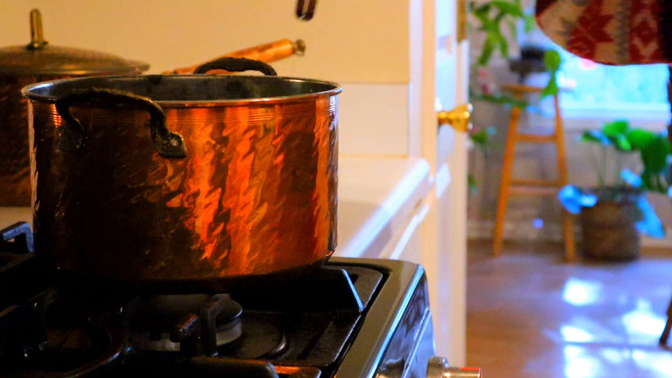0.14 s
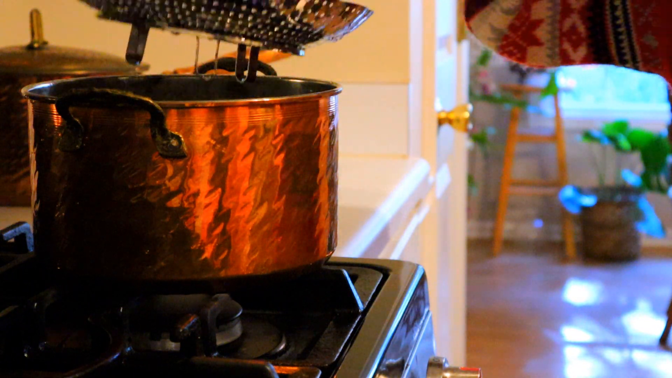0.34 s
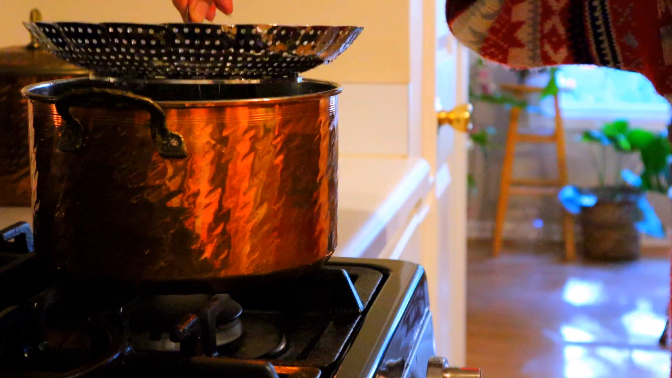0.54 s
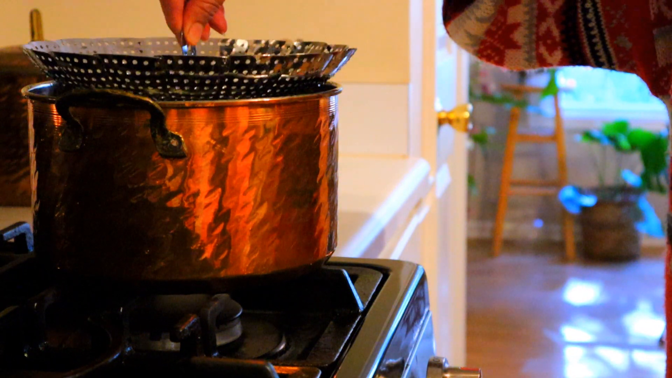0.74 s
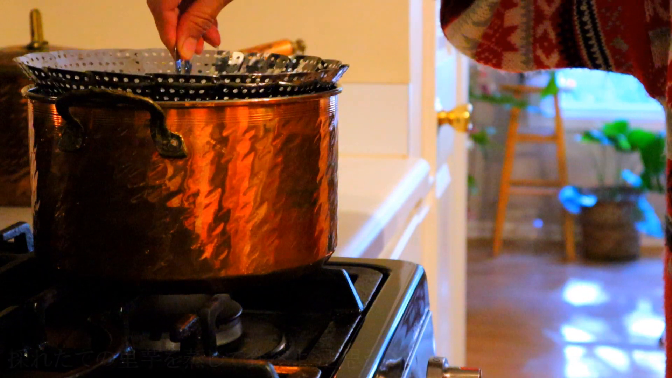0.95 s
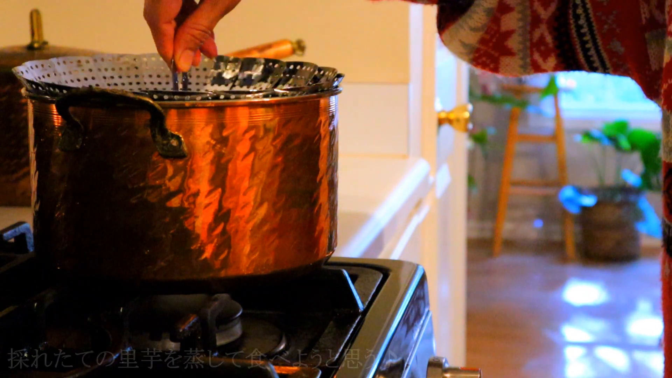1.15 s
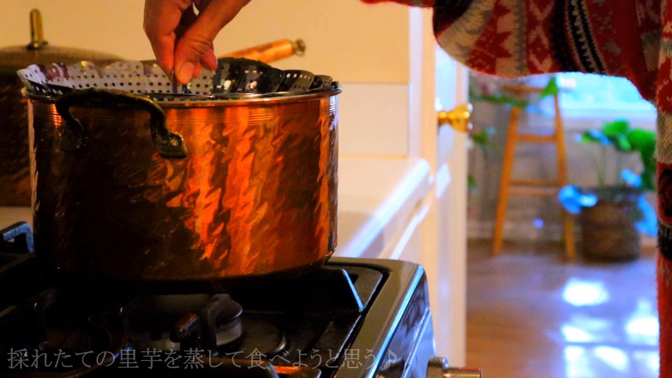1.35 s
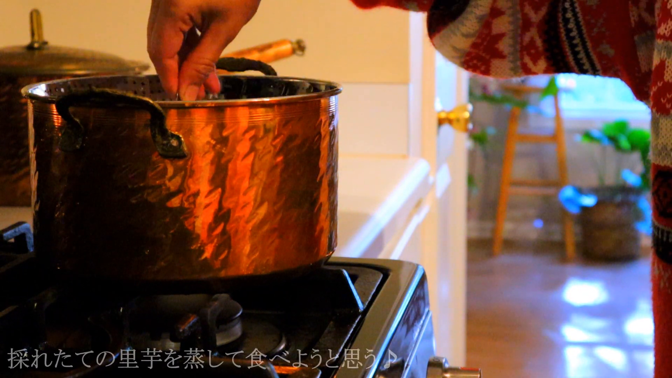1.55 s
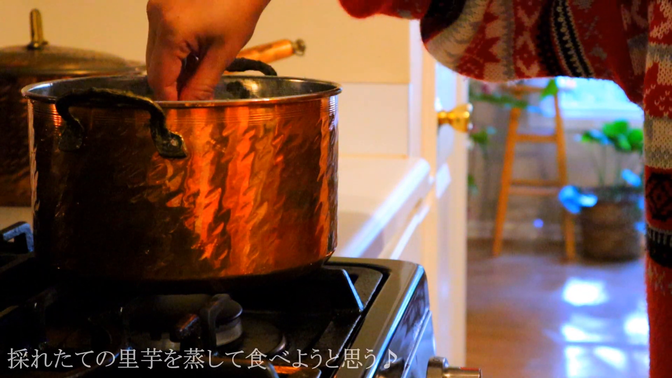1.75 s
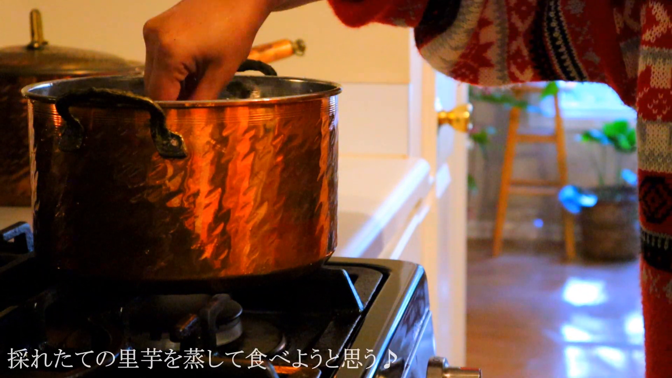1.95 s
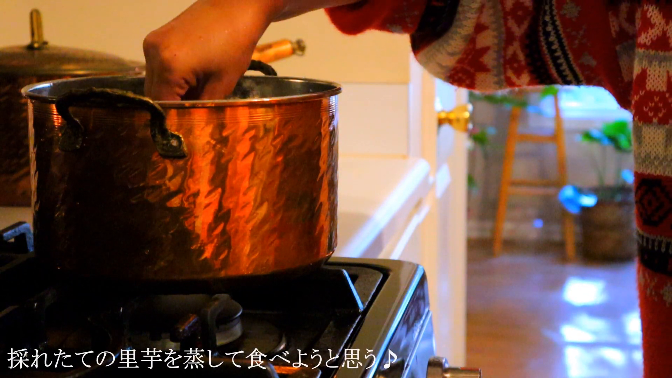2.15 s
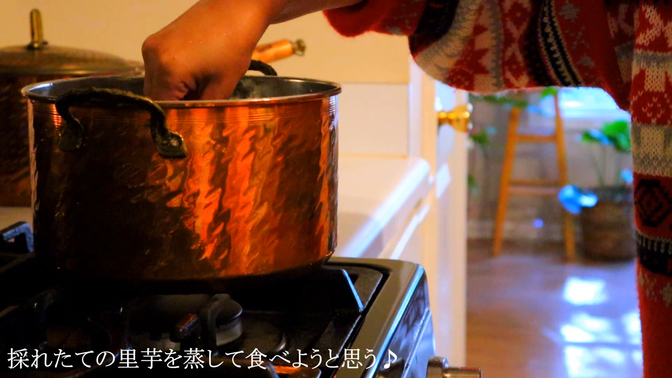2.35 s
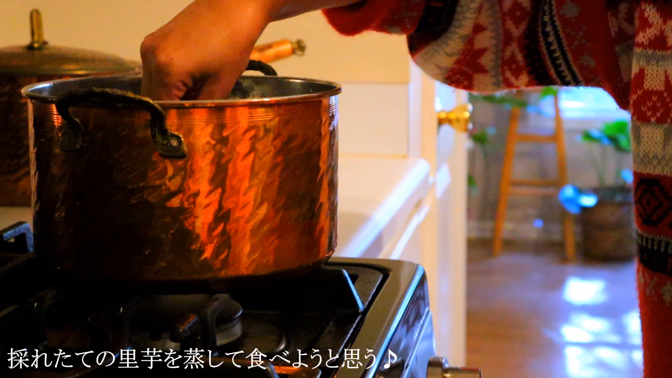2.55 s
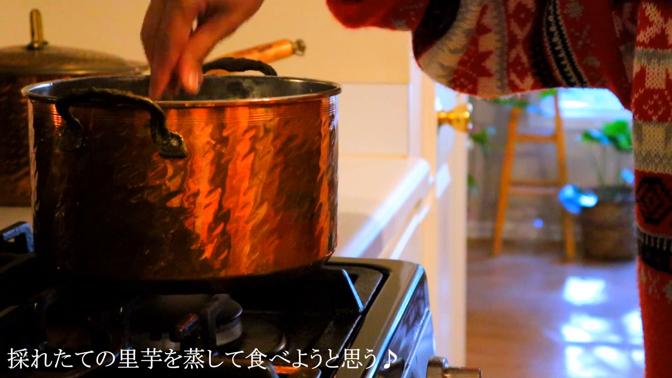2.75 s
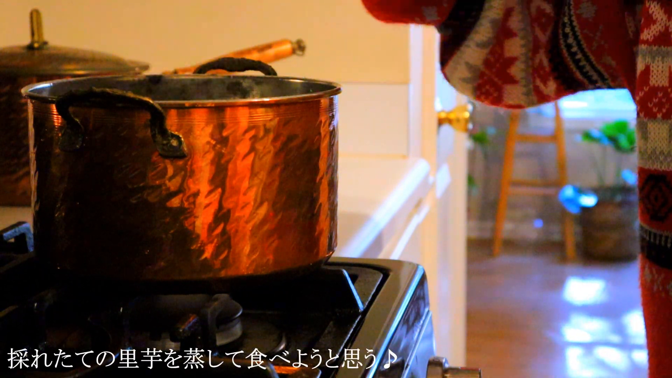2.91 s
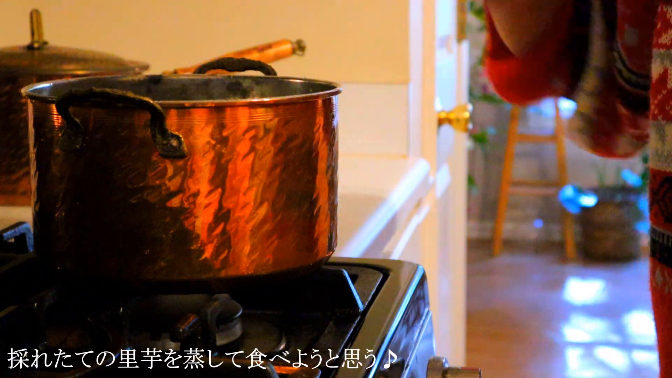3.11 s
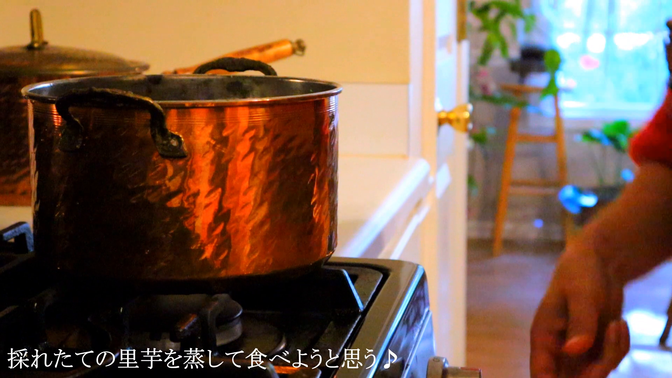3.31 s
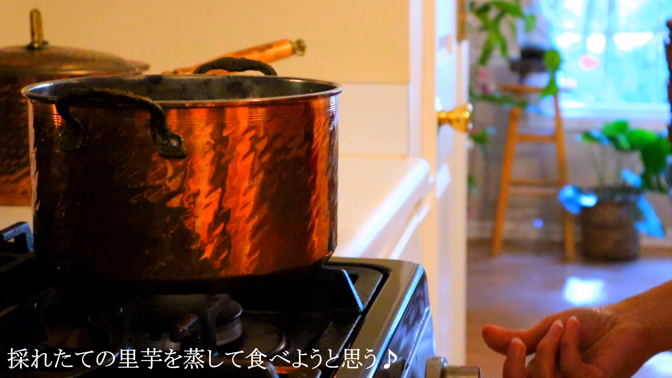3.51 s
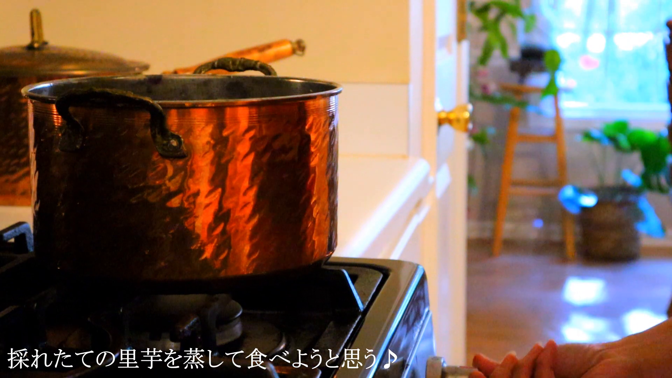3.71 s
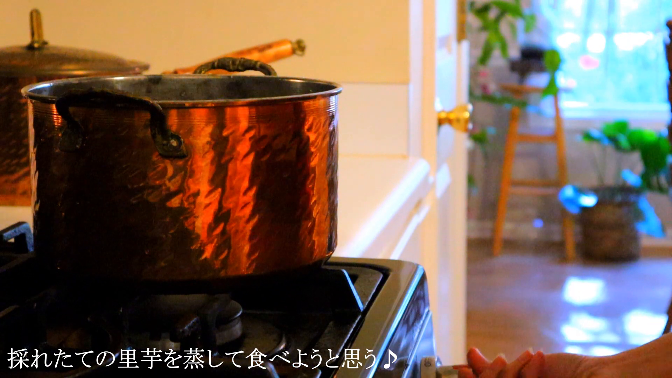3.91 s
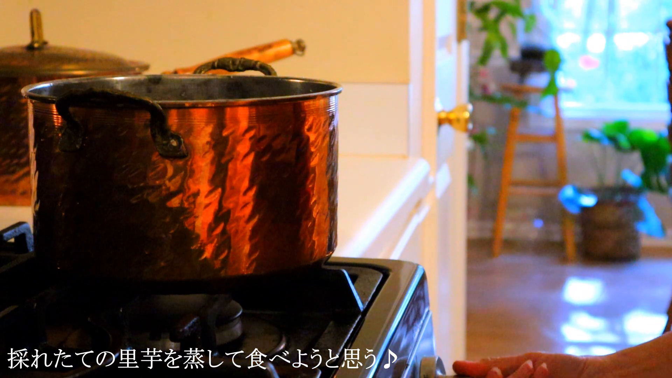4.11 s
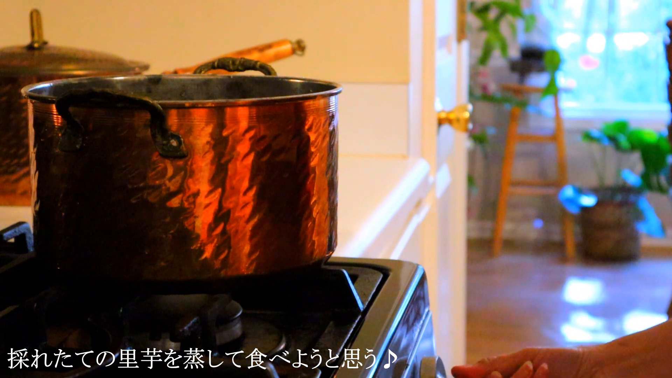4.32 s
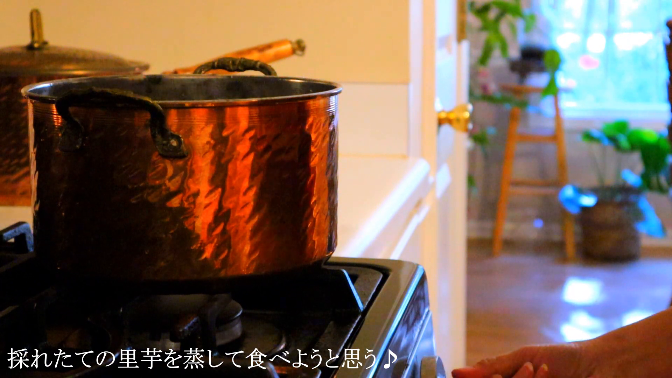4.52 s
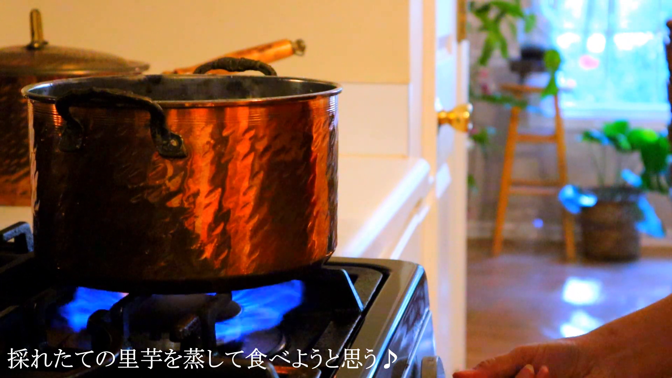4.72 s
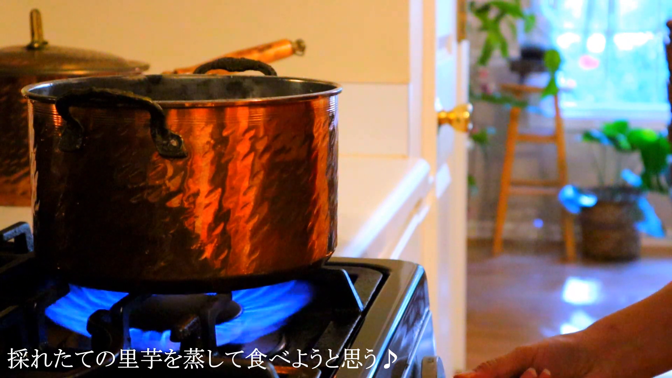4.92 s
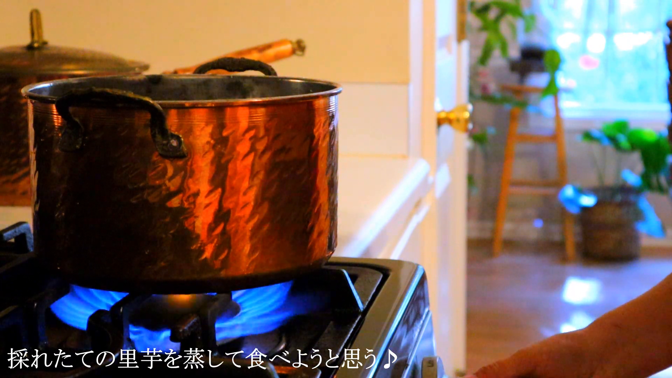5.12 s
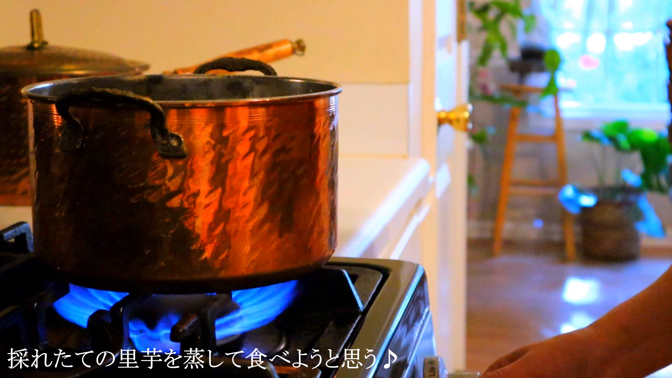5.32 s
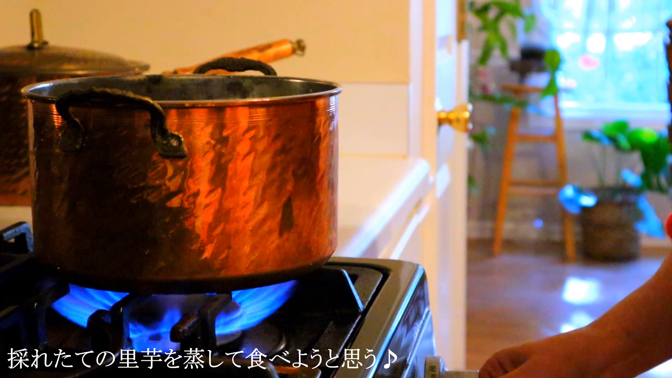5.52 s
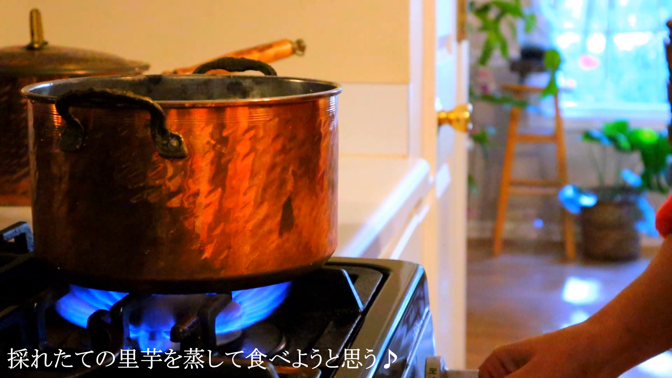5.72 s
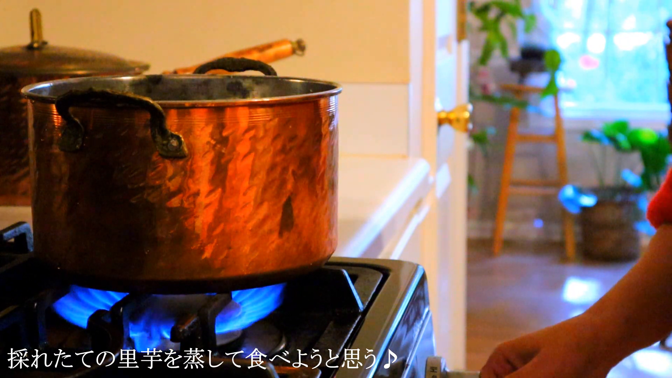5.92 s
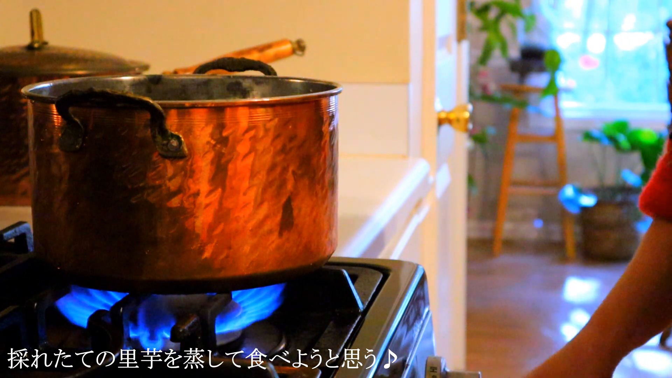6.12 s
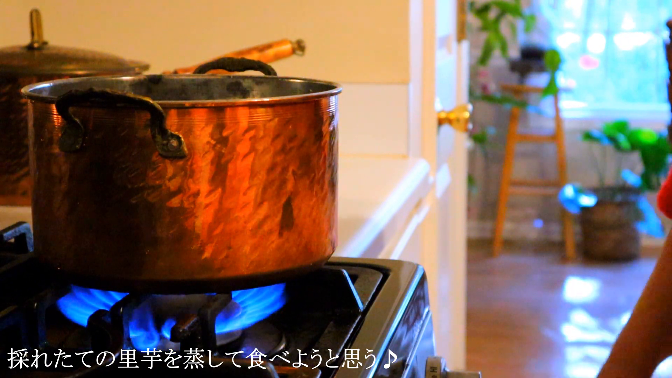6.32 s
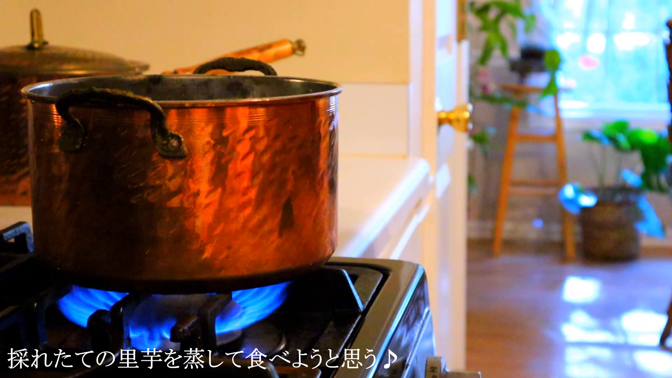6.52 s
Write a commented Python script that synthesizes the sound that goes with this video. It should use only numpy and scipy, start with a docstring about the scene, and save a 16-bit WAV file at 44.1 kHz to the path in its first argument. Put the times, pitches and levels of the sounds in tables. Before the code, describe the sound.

In a small, quiet kitchen, a folding steel basket clashes onto a pot rim, then scrapes and chatters down the inside with a ringing, metallic rasp and settles with a knock. Light ticks follow, then dull knob clunks. Five evenly spaced igniter snaps crack loudly; gas catches in a soft flutter during them, leaving a low roar and thin hiss. Close stereo microphone, with short room reverberation.

```python
"""Steamer basket and gas burner

A folding steel steamer basket lands on a copper pot in a small kitchen and is pushed down, its leaves scraping.
Steel and pot ring as decaying modes; the scrape is a random train of stick-slip clicks driving resonances.
A knob is pressed and turned with knocks and ticks, and an igniter snaps five times as short noise bursts.
The gas catches in a flutter of puffs, then the burner roars softly and hisses through the tube's resonances."""
import sys
import numpy as np
from scipy import signal
from scipy.fft import rfft, irfft
from scipy.io import wavfile

SR = 44100
rng = np.random.default_rng(int(sys.argv[2]) if len(sys.argv) > 2 else 0)


def dump(signal):
    """Clip the signal to [-1, 1] and save it as 16-bit WAV at the path in sys.argv[1]."""
    limited = np.clip(np.atleast_2d(signal).T, -1, 1)
    pcm = np.round(limited * 32767).astype(np.int16)
    wavfile.write(sys.argv[1], SR, pcm)


N = 293485
TIME = np.arange(N) / SR

# All spectra are relative densities: the sounds shaped by them are normalised afterwards.
# Flat spectrum: frequency_hz, density_db
WHITE = [(50, 0), (16000, 0)]
# Stereo width of diffuse sound: frequency_hz, side_minus_mid_db
WIDE = [(60, -17), (150, -2.5), (300, 1.5), (600, 2.5), (1200, 4.5), (12000, 8)]
# Stereo width of the room: frequency_hz, side_minus_mid_db
ROOM_WIDTH = [(150, -28), (400, -6.5), (1200, -9), (2400, 4), (5000, 0), (10000, -3.5)]
# Stereo width of the pot and basket: frequency_hz, side_minus_mid_db
POT_WIDTH = [(150, -24), (400, -3.5), (1200, -7), (3000, 4), (12000, 1)]
# Stereo width of the stove body: frequency_hz, side_minus_mid_db
STOVE_WIDTH = [(60, -23), (300, -27), (600, -10.5), (1200, -6), (3000, 5)]
# Stereo width of the flames: frequency_hz, side_minus_mid_db
FLAME_WIDTH = [(300, -27), (1200, -8.5), (2400, -6), (5000, 6), (12000, 9)]
# Stereo width of sparks and snaps, before each spark's own offset: frequency_hz, side_minus_mid_db
SPARK_WIDTH = [(1000, -12), (5000, -2.5), (8000, -4.5), (14000, -3)]

# Spectrum of the room tone: frequency_hz, density_db
ROOM_TONE_SPECTRUM = [(15, -20.5), (30, -4), (65, -1), (330, -3), (600, -5.5), (1400, -8.5), (3000, -12.5),
                      (6000, -22), (12400, -30.5), (15000, -57)]
ROOM_TONE_DB, ROOM_TONE_PAN_DB = -52.5, -1.4  # pan: left minus right
# Reverberation time of the kitchen: frequency_hz, t60_s
KITCHEN_T60 = [(100, 0.54), (500, 0.6), (2000, 0.66), (5000, 0.64), (9000, 0.47), (15000, 0.28)]

# A sleeve brushes as the basket is carried over: middle_s, half_length_s, level_db
SLEEVE = [(.08, 0.4, -60.5), (0.45, 0.073, -61)]
# Spectrum of ticks and of the brushing sleeve: frequency_hz, density_db
TICK_SPECTRUM = [(300, -8), (1500, -10), (3000, 4), (6500, 1), (10000, 0), (13000, -5.5), (16000, -62)]
# Ring of small steel parts after a tick: frequency_hz, density_db
TICK_RING_SPECTRUM = [(300, -8), (2200, -10.5), (3400, -1), (5000, -4), (8000, -8.5), (11500, -9),
                      (16000, -66)]
# Light touches of fingers on steel and knob: start_s, level_db, touch_length_s
TICKS = [(1.055, -18.5, 0.16), (1.557, -13.5, 0.087), (2.2407, -11, 0.0078), (2.4958, -11.5, 0.031),
         (2.596, -16.5, 0.032), (2.627, -11.5, 0.052), (2.833, -24.5, 0.024), (2.944, -20, 0.036),
         (2.9716, -16.5, 0.045), (3.06, -16.5, 0.2), (3.1782, -12, 0.059), (3.3059, -8, 0.072),
         (3.6857, -13, 0.1), (3.771, -14.5, 0.13), (3.8827, -8.5, 0.051), (4.003, -18, 0.046),
         (4.034, -15.5, 0.065), (4.249, -16.5, 0.15), (5.486, -18, 0.071)]
HAND_PAN_DB = -3  # left minus right
# Touches longer than this also lift one rattling resonance, by so many dB per extra second
SOFT_TOUCH_S, RATTLE_HZ, RATTLE_Q, RATTLE_DB_PER_S = 0.084, 3280, 2.5, 196
TOUCH_RISE_SHARE = 0.011  # rise time constant, as a share of the touch's length

# Spectrum of dull knocks: frequency_hz, density_db
KNOCK_SPECTRUM = [(35, -5), (80, -0.5), (160, -2), (240, -6), (340, -6.5), (520, -11.5), (800, -15.5),
                  (1100, -21.5), (1800, -28), (5000, -32.5), (14000, -58.5)]
# Knocks on pot and stove: start_s, level_db, t60_s, tilt_db_per_octave, body_hz, body_lift_db
KNOCKS = [(0.004, -12.5, 0.21, 6.5, 363, 27), (1.159, -10.5, 1, 3.5, 395, -3),
          (2.3665, -7.5, 0.052, 6.5, 613, 12.5), (2.388, -10, 0.032, 8.5, 433, 17.5),
          (2.399, -22, 0.031, 3.5, 590, 13), (2.409, -16, 0.17, -1, 185, 21),
          (3.303, -20.5, 0.1, 8, 780, 25), (3.626, -8, 0.066, 2, 385, 8), (3.666, -13, 0.21, 0.5, 340, 13),
          (3.733, -20, 0.032, -2, 278, 14), (3.887, -11, 0.25, 5.5, 824, 16),
          (3.904, -9.5, 0.091, 2, 298, 1), (3.935, -7, 0.09, 1.5, 795, 6),
          (3.953, -10, 0.076, -0.5, 330, 7), (3.976, -14.5, .16, 0, 400, -3),
          (5.385, -17, 0.042, 5, 1040, 14), (5.393, -16, 0.16, 4.5, 402, 5.5)]
# Sheet-metal stove top: pitch_hz, t60_s
STOVE_TOP = (162, .33)
# Pushes on the knob that set the stove top humming: start_s, level_db
PUSHES = [(3.63, -42), (3.73, -45), (3.903, -39), (3.932, -40)]

# Spectrum of a spark's crack and rattle: frequency_hz, density_db
SPARK_SPECTRUM = [(150, -19.5), (600, -27), (1200, -18.5), (2800, -8), (4000, -10.5), (5500, -4.5),
                  (7500, 2), (9000, -4.5), (11000, -2), (13000, -10), (16000, -29)]
# Spectrum a spark sends into the room: frequency_hz, density_db
SPARK_SPREAD = [(150, -45), (600, -23), (1200, -17.5), (2800, -9), (5500, -3), (7500, 2), (11000, 0),
                (13000, -7.5), (15500, -49)]
# Igniter sparks: start_s, level_db, arc_t60_s, width_offset_db
SPARKS = [(4.358, 11, 0.0053, 11.5), (4.5571, 10.5, 0.012, 5.5), (4.7574, 10.5, 0.012, 3.5),
          (4.9572, 8, 0.0094, -6), (5.157, 7, 0.012, -1.5)]
# Separate echoes of a spark off hob and walls: delay_s, level_db
SPARK_ECHOES = [(.0032, -10), (0.0134, -18.5), (.05, -33)]

# Spectrum of a puff of catching gas, before the bass is removed: frequency_hz, density_db
PUFF_SPECTRUM = [(45, -20), (80, 2), (140, 0), (215, -8), (520, -12.5), (620, -6), (850, -10.5),
                 (1150, -20), (2000, -19), (4000, -38), (9000, -60)]
# The flame jumps round the burner in an uneven run of puffs: start_s, level_db
PUFFS = [(4.78, -12.5), (4.794, -8), (4.811, -7), (4.838, -6.5), (4.851, -7.5), (4.878, -5), (4.884, -7.5),
         (4.908, -9.5), (4.926, -9)]
# Spectrum of the flames' roar: frequency_hz, density_db
FLAME_SPECTRUM = [(24, -34), (40, -16), (70, 2), (112, -8), (136, 2), (218, 0.5), (271, -4), (520, -8),
                  (631, -5.5), (1000, -6), (1270, -12), (1920, -19), (2280, -14.5), (3970, -16.5),
                  (4480, -27), (5440, -19), (11000, -22), (13000, -48)]
# Resonances of the mixing tube, levels relative: centre_hz, width_hz, level_db
TUBE = [(609, 13, -4), (1292, 71, -5.5), (2265, 62, -10), (3037, 55, -10.5), (4360, 79, -11.5),
        (4690, 80, -13.5), (6170, 380, -18.5), (7520, 92, -16.5), (9950, 170, -22), (10760, 130, -14.5),
        (11270, 210, -19)]
# Gas flow, as the mean level of the jet: time_s, level_db
GAS_FLOW = [(4.7, -100), (4.9, -60), (5.4, -54), (6.0, -53.5), (6.65, -48)]
# The roar follows the flow, and builds up while the flames settle on their ports
ROAR_DB, FLAMES_SETTLED_S, ROAR_BUILD_DB_PER_S = 0.8, 5.99, 20

# Basket and pot ringing together, levels relative: pitch_hz, level_db
BASKET_MODES = [(1147, -11), (1427, -10), (1661, -9), (1788, -10), (1850, -8), (2098, -7), (2209, -6),
                (2405, -7), (2500, -11), (2789, -3), (2835, -6), (2892, -3), (2978, -4), (4358, -13),
                (5135, -12), (5525, -14)]
BASKET_T60_S, BASKET_PAN_DB = 0.36, -0.5  # pan: left minus right
# Spectrum of clashing leaves: frequency_hz, density_db
LEAF_SPECTRUM = [(150, -28), (303, -28), (410, -8), (998, -20), (1630, -5), (2400, -3), (2850, -1.5),
                 (3230, -6.5), (6080, -17.5), (8570, -24), (10200, -19.5), (12600, -29), (15000, -50)]
# Leaves landing on rim, then bottom: start_s, strength_db, tilt_db_per_octave, leaf_hz, leaf_share_db
LANDING = [(1.1591, 1.5, 2, 12500, -2), (1.163, -4.5, 3, 2800, -10), (1.183, -5.5, -1, 3500, -6),
           (1.19, -6.5, -0.5, 2900, -1), (1.212, -7.5, -2, 2400, -2), (1.226, -7, 4, 2880, -4),
           (1.2441, -8.5, 1, 5640, -5), (1.2569, -7, 2.5, 6140, -5.5), (2.366, -12.5, 5, 1900, -6),
           (2.381, -11, 3, 1880, -2), (2.388, -14.5, 6, 2900, -1)]
CLASH_T60_S, LEAF_Q = 0.13, 12
# A leaf catches and sings: start_s, length_s, pitch_hz, level_db
SQUEALS = [(1.688, 0.08, 2960, -33.5), (1.825, .03, 2900, -39), (2.04, 0.08, 1153, -46),
           (2.09, 0.06, 2870, -39.5)]
SQUEAL_ATTACK_S, SQUEAL_RELEASE_S = 0.003, 0.015  # time constants
# The basket slides down: start_s, end_s
SLIDING_S = (1.22, 2.42)
# How hard the leaves bear on the pot wall, before each layer's own offset: time_s, level_db
SLIDE = [(1.22, -80), (1.26, -62), (1.49, -49), (1.57, -45.5), (1.675, -43.5), (1.75, -30), (1.795, -34),
         (1.9, -32), (1.99, -32), (2.045, -34), (2.115, -34.5), (2.33, -43), (2.42, -52)]
# Spectrum of the sheet's dense modes under the scrape: frequency_hz, density_db
SCRAPE_SPECTRUM = [(80, -30), (230, -17), (600, -10), (950, -14.5), (1200, -3.5), (1800, -5), (2900, 2),
                   (3800, -1), (5500, -5), (15000, -37)]
SHEET_T60_S = 0.12
# Spectrum of the fine rasp: frequency_hz, density_db
RASP_SPECTRUM = [(2000, -23), (4000, -10.5), (5400, 1.5), (7000, -5), (9000, -8), (11000, -3.5),
                 (13000, -7), (15500, -54)]
# Rasp at the hardest push; it grows faster than the scrape, and as the leaves fold tighter
RASP_DB, RASP_FOLLOWS, RASP_DB_PER_S = -34, 1.62, 7.5
# The leaves give way and rasp harder for a moment: start_s, decay_s, extra_db
GIVE_WAY = (1.972, 0.17, 7.8)
# Broad resonances of the leaves under the scrape, mean levels relative: pitch_hz, level_db
LEAF_BANDS = [(1650, -6), (2210, -1.5), (2420, -6), (2800, -4), (2980, 0.5), (3330, -6.5), (4400, -1.5),
              (5510, -13), (11800, -25)]
BAND_WIDTH = 0.025  # half width, as a share of the pitch
# The bands swell and shift as the contact moves: rate, swell in dB, shift as a share of the pitch
CONTACT_MOVES_PER_S, BAND_SWELL_DB, BAND_SHIFT = 22, 3.5, 0.035
# Chatter against the scrape at its hardest, and how much faster it grows
CHATTER_DB, CHATTER_FOLLOWS = -5.5, 1.4

CUTOFF_HZ = 16000


def from_db(db):
    """Level: decibels express a logarithmic amplitude ratio, here turned to gain."""
    return 10 ** (np.asarray(db) / 20)


def rms_one(x):
    """Mean power: scale a signal to rms 1."""
    return x / np.sqrt(np.mean(x ** 2) + 1e-20)


def energy_one(x):
    """Impulse energy: scale a response to energy 1 a channel on average."""
    return rms_one(x) / np.sqrt(x.shape[-1])


def in_time(rows):
    """Level history: interpolate dB over time, at -120 dB before the first point."""
    return np.interp(TIME, *np.transpose(rows), left=-120)


def at_hz(points, hz):
    """Logarithmic frequency: interpolate a table along a log-frequency axis."""
    table_hz, values = np.array(points).T
    return np.interp(np.log(hz + 1), np.log(table_hz), values)


def fade(t60):
    """Exponential decay: one second of a level falling 60 dB in t60 seconds."""
    return np.exp(-np.log(1000) * TIME[:SR] / t60)


def swell(rise_s):
    """Exponential approach: one second of a rise to 1 with time constant rise_s."""
    return 1 - np.exp(-TIME[:SR] / rise_s)


def pan(db):
    """Interaural level difference: left and right gains, left minus right in dB."""
    return from_db(db * np.array([[0.5], [-0.5]]))


def add(out, s, sound):
    """Superposition: mix a sound in at time s."""
    start = max(round(s * SR), 0)
    out[..., start:start + sound.shape[-1]] += sound[..., :N - start]


def through(x, response):
    """Linear response: convolve a sound with an impulse response."""
    return signal.fftconvolve(np.atleast_2d(x), response, axes=-1)[:, :N]


def peak(x, hz, q):
    """Simple resonance: keep the band around hz, with quality factor q."""
    return signal.lfilter(*signal.iirpeak(hz, q, fs=SR), x + 1e-18)


def drift(rate, size=N):
    """Random fluctuation: noise through a double low-pass at rate Hz, with spread 1."""
    step, run_in = 8, 4000  # computed at every eighth sample, after the filter has settled
    r = np.exp(-2 * np.pi * rate * step / SR)
    white = rng.standard_normal(size // step + run_in + 2)
    slow = signal.lfilter([1], [1, -2 * r, r * r], white)[run_in:]
    return np.interp(np.arange(size) / step, np.arange(len(slow)), rms_one(slow))


def noise(spectrum, width, size, tilt_db=0, wider_db=0):
    """Partial coherence: coloured noise from independent mid and side signals; rms 1."""
    hz = np.fft.rfftfreq(size, 1 / SR)
    mid, side = rfft(rng.standard_normal((2, size)))
    spread = from_db(at_hz(width, hz) + wider_db)
    colour = from_db(at_hz(spectrum, hz) + tilt_db * np.log2(1 + hz))
    left_right = (mid + spread * side * [[1], [-1]]) / np.hypot(1, spread)
    return rms_one(irfft(colour * left_right, size))


def burst(spectrum, width, t60, tilt_db=0, wider_db=0, rise_s=0.0011):
    """Modal overlap: a struck cluster of dense modes as decaying noise; soft contacts rise slowly; energy 1."""
    modes = noise(spectrum, width, SR, tilt_db, wider_db)
    return energy_one(modes * fade(t60) * swell(rise_s))


def smooth_clicks(rows, spectrum):
    """Radiated power: clicks summed over all directions have an even spectrum, without one path's notches."""
    clicks = np.zeros(N)
    for s, db, *rest in rows:
        clicks[round(s * SR)] = from_db(db)
    colour = rms_one(from_db(at_hz(spectrum, np.fft.rfftfreq(N, 1 / SR))))
    return irfft(rfft(clicks) * colour, N)


def room_tone():
    """Stationary background: steady coloured noise gives the kitchen's quiet hum."""
    return from_db(ROOM_TONE_DB) * noise(ROOM_TONE_SPECTRUM, WIDE, N) * pan(ROOM_TONE_PAN_DB)


def kitchen(build_s=0.018, uneven_db=2.5, blend_s=0.15):
    """Reverberation: reflections start in uneven clumps, blend, and die band by band."""
    white, hz = rfft(noise(WHITE, ROOM_WIDTH, SR)), np.fft.rfftfreq(SR, 1 / SR)
    centres = np.geomspace(100, 15000, 8)
    tail = 0
    for centre, row in zip(centres, np.eye(len(centres))):
        share = np.interp(np.log(hz + 1), np.log(centres), row)  # overlapping bands that sum to 1
        tail = tail + irfft(white * share, SR) * fade(at_hz(KITCHEN_T60, centre))
    clumps = from_db(uneven_db * drift(400, SR) * np.exp(-TIME[:SR] / blend_s))
    return energy_one(tail * swell(build_s) * clumps)


def sleeve():
    """Friction noise: a brushing sleeve gives noise under bell-shaped swells."""
    brushing = sum(from_db(db) * np.exp(-((TIME - s) / half_s) ** 2) for s, half_s, db in SLEEVE)
    return brushing * noise(TICK_SPECTRUM, WIDE, N, tilt_db=3.5)


def rattle_lift_db(touch_s):
    """Contact duration: a touch past the soft limit lifts the rattle in proportion to the excess."""
    return RATTLE_DB_PER_S * max(touch_s - SOFT_TOUCH_S, 0)


def ticks(softening_db_per_s=170):
    """Contact stiffness: a tick is a snap and a short ring; longer touches snap less, the longest rattle."""
    out = np.zeros((2, N))
    for s, db, touch_s in TICKS:
        snap = burst(TICK_SPECTRUM, SPARK_WIDTH, t60=0.005, tilt_db=1.5, rise_s=0.0001)
        ring = burst(TICK_RING_SPECTRUM, WIDE, t60=touch_s + 0.1, rise_s=TOUCH_RISE_SHARE * touch_s)
        rattle = (from_db(rattle_lift_db(touch_s)) - 1) * peak(ring, RATTLE_HZ, RATTLE_Q)
        softened_snap = from_db(-softening_db_per_s * touch_s) * snap
        add(out, s, from_db(db) * (softened_snap + energy_one(ring + rattle)))
    return out


def handling(body_q=1.8):
    """Impact excitation: seating basket and turning knob knock on bodies; pushes make the stove top hum."""
    out = np.zeros((2, N))
    for s, db, t60, tilt_db, body_hz, lift_db in KNOCKS:
        knock = burst(KNOCK_SPECTRUM, STOVE_WIDTH, t60, tilt_db)
        body = (from_db(lift_db) - 1) * peak(knock, body_hz, body_q)
        add(out, s, from_db(db) * energy_one(knock + body))
    hum_hz, hum_t60 = STOVE_TOP
    envelope = fade(hum_t60) - fade(0.022)  # the faster decay makes a soft onset
    for s, db in PUSHES:
        add(out, s, from_db(db) * np.sin(2 * np.pi * hum_hz * (s + TIME[:SR])) * envelope)
    return out


def igniter(rattle_db=-0.5, uneven_db=-0.5):
    """Impulsive source: a spark cracks, rattles unevenly between hob and pot, and returns as discrete echoes."""
    out = np.zeros((2, N))
    for s, db, arc_s, wider_db in SPARKS:
        crack = burst(SPARK_SPECTRUM, SPARK_WIDTH, arc_s, wider_db=wider_db, rise_s=0.00063)
        rattle = burst(SPARK_SPECTRUM, SPARK_WIDTH, t60=0.05, wider_db=wider_db)
        rattle = energy_one(rattle * from_db(uneven_db * drift(500, SR)))
        add(out, s, from_db(db) * energy_one(crack + from_db(rattle_db) * rattle))
        for delay_s, echo_db in SPARK_ECHOES:
            echo = burst(SPARK_SPREAD, ROOM_WIDTH, t60=0.008, rise_s=0.0003)
            add(out, s + delay_s, from_db(db + echo_db) * echo)
    return out


def ignition():
    """Combustion pulses: catching gas gives a quick run of soft noise puffs, with no deep bass."""
    out = np.zeros((2, N))
    for s, db in PUFFS:
        add(out, s, from_db(db) * burst(PUFF_SPECTRUM, STOVE_WIDTH, t60=0.14))
    return signal.sosfilt(signal.butter(5, 58, "high", fs=SR, output="sos"), out + 1e-18)


def burner():
    """Turbulent flow: flames roar softly while jet noise hisses through the mixing tube's resonances."""
    jet_db = in_time(GAS_FLOW)
    roar_db = jet_db + ROAR_DB - ROAR_BUILD_DB_PER_S * np.maximum(FLAMES_SETTLED_S - TIME, 0)
    roar = from_db(roar_db + 0.77 * drift(rate=12)) * noise(FLAME_SPECTRUM, FLAME_WIDTH, N)
    hz = np.fft.rfftfreq(N, 1 / SR)
    tube_power = sum(from_db(db) ** 2 / (1 + (2 * (hz - centre) / width) ** 2) for centre, width, db in TUBE)
    turbulence = noise(WHITE, FLAME_WIDTH, N, tilt_db=1.5)
    jet = rms_one(irfft(np.sqrt(tube_power) * rfft(turbulence), N))
    return roar + from_db(jet_db + 2.2 * drift(rate=2)) * jet


def basket_ring():
    """Modal superposition: decaying sines, each reaching each ear with a phase of its own; energy 1."""
    phases = rng.uniform(0, 2 * np.pi, (len(BASKET_MODES), 2, 1))
    modes = 0
    for (hz, db), phase in zip(BASKET_MODES, phases):
        modes = modes + from_db(db) * np.sin(2 * np.pi * hz * TIME[:SR] + phase)
    return energy_one(modes * fade(BASKET_T60_S))


def landing():
    """Impact excitation: each touch clashes all the leaves and makes the struck one ring above the rest."""
    out = np.zeros((2, N))
    for s, db, tilt_db, leaf_hz, leaf_db in LANDING:
        clash = burst(LEAF_SPECTRUM, POT_WIDTH, CLASH_T60_S, tilt_db, rise_s=0.00032)
        leaf = from_db(leaf_db) * energy_one(peak(clash, leaf_hz, LEAF_Q))
        add(out, s, from_db(db) * (clash + leaf + from_db(-5.0) * basket_ring()))
    return out


def squeals(waver=0.011, rough_db=4.0):
    """Mode locking: friction locks on to single modes, which sing unsteadily; waver is a share of the pitch."""
    out, t = np.zeros((2, N)), TIME[:SR]
    wander = np.cumsum(waver * drift(rate=93.0)) / SR
    for s, length_s, hz, db in SQUEALS:
        envelope = swell(SQUEAL_ATTACK_S) * np.exp(-np.maximum(t - length_s, 0) / SQUEAL_RELEASE_S)
        phase = 2 * np.pi * hz * (t + wander[round(s * SR):][:SR])
        ear_phases = np.array([[0], [1]])  # radians
        add(out, s, from_db(db) * envelope * np.sin(phase + ear_phases))
    return out * from_db(rough_db * drift(rate=170))


def slips(per_s, spread_db):
    """Stick-slip: a dense random train of uneven clicks of either sign; rms 1."""
    sizes = from_db(spread_db * np.minimum(rng.exponential(1, N), 4)) * rng.choice([-1, 1], N)
    return rms_one(sizes * (rng.random(N) < per_s / SR))


def leaf_bands():
    """Driven resonance: friction feeds broad bands, each swelling and shifting alone; rms 1 while sliding."""
    out, (start, end) = np.zeros((2, N)), SLIDING_S
    size, bands = round((end - start) * SR), 0
    for hz, db in LEAF_BANDS:
        width_hz = BAND_WIDTH * hz
        shifting_hz = hz * (1 + BAND_SHIFT * drift(CONTACT_MOVES_PER_S, size))
        phase = 2 * np.pi * np.cumsum(shifting_hz) / SR
        # slow noise on cosine and sine makes a narrow noise band, independent at each ear
        ears = [drift(width_hz, size) * np.cos(phase) + drift(width_hz, size) * np.sin(phase) for ear in range(2)]
        bands = bands + from_db(db + BAND_SWELL_DB * drift(CONTACT_MOVES_PER_S, size)) * np.array(ears)
    add(out, start, rms_one(bands))
    return out


def chatter(count=300, t60=0.12, spread_db=4.0, low_hz=1400, high_hz=7000):
    """Catch and release: leaf edges let go, each with a short ring at its own pitch; rms 1 while sliding."""
    out, (start, end) = np.zeros((2, N)), SLIDING_S
    size = SR // 6
    decay = fade(t60)[:size]
    for when, pitch, grip, left, right in rng.random((count, 5)):
        hz = low_hz * (high_hz / low_hz) ** pitch
        phase = 2 * np.pi * (hz * TIME[:size] + np.array([[left], [right]]))
        gain = from_db(-spread_db * np.log(grip + 0.062))
        add(out, start + (end - start) * when, gain * np.sin(phase) * decay)
    return rms_one(out) * np.sqrt((end - start) * SR / N)


def basket(judder_db=-1.0, judder_hz=70):
    """Stick-slip excitation: the leaves fold and scrape down the inside of the pot, juddering as they go."""
    scrape_db = np.where(TIME < SLIDING_S[1], in_time(SLIDE), -120)
    hardest_db = scrape_db.max()
    push_db = scrape_db - hardest_db
    folded_s = np.clip(TIME, *SLIDING_S) - TIME[scrape_db.argmax()]  # from the hardest push
    rasp_db = RASP_DB + RASP_FOLLOWS * push_db + RASP_DB_PER_S * folded_s
    give_s, decay_s, give_db = GIVE_WAY
    rasp_db = rasp_db + give_db * (TIME > give_s) * np.exp(-np.abs(TIME - give_s) / decay_s)
    force = slips(per_s=700, spread_db=2.5)
    # the contact keeps moving, so every slip wakes another set of short-lived modes
    slip_envelope = np.sqrt(np.abs(through(force ** 2, fade(0.033)[None])))
    grains = rms_one(slip_envelope * from_db(judder_db * drift(judder_hz)))
    out = grains * from_db(scrape_db - 5.0) * leaf_bands()
    # the slips also strike the dense modes of the perforated sheet
    out += through(force * from_db(scrape_db - 1.5), burst(SCRAPE_SPECTRUM, POT_WIDTH, SHEET_T60_S))
    out += grains * from_db(rasp_db) * noise(RASP_SPECTRUM, POT_WIDTH, N)
    out += from_db(hardest_db + CHATTER_DB + CHATTER_FOLLOWS * push_db) * chatter()
    return out + through(force * from_db(scrape_db - 4.5), basket_ring())


def scene():
    """Superposition: direct sounds, and a reverberant field fed by steel, knocks, puffs, sparks and ticks."""
    steel = (landing() + basket() + squeals()) * pan(BASKET_PAN_DB)
    knocks, puffs = handling(), ignition()
    to_room = (from_db(-10.0) * steel + from_db(-5.0) * knocks + from_db(-22) * puffs)[0]
    # touches past the soft limit sound fainter in the room
    room_ticks = [(s, db - rattle_lift_db(touch_s)) for s, db, touch_s in TICKS]
    to_room = to_room + from_db(-7.5) * smooth_clicks(SPARKS, SPARK_SPREAD)
    to_room = to_room + from_db(-4.0) * smooth_clicks(room_ticks, TICK_SPECTRUM)
    hands = (sleeve() + ticks()) * pan(HAND_PAN_DB)
    direct = steel + knocks + puffs + hands + igniter() + burner()
    return direct + through(to_room, kitchen()) + room_tone()


def record(dry):
    """Overload and band limit: peaks beyond full scale are clipped, then the top is cut."""
    top_cut = signal.cheby2(14, 70, CUTOFF_HZ + 600, fs=SR, output="sos")
    return signal.sosfilt(top_cut, np.clip(dry, -1, 1))


dry = scene()
out = record(dry)
dump(out)
```